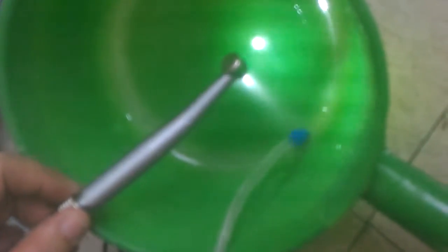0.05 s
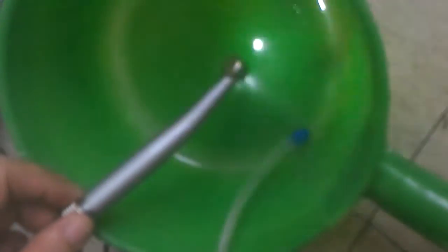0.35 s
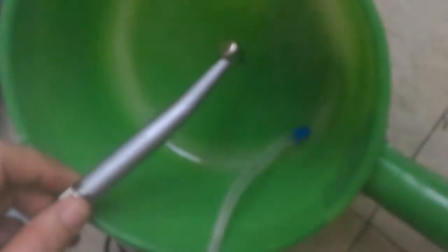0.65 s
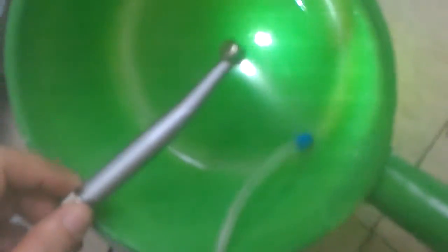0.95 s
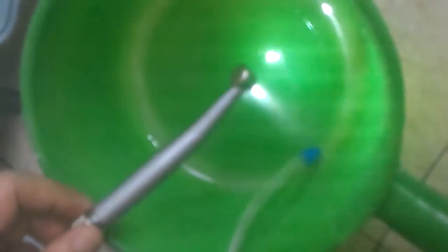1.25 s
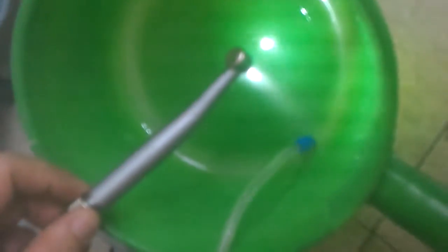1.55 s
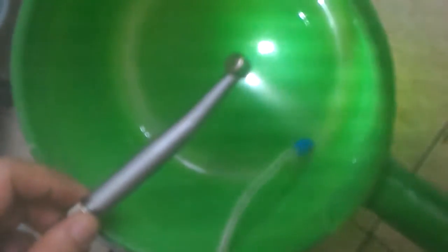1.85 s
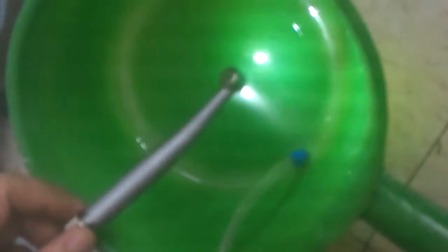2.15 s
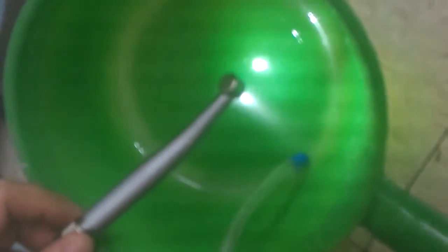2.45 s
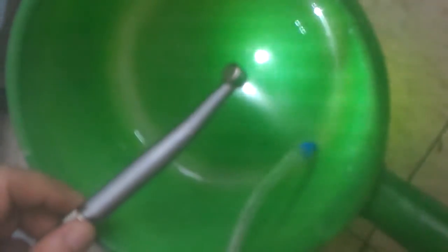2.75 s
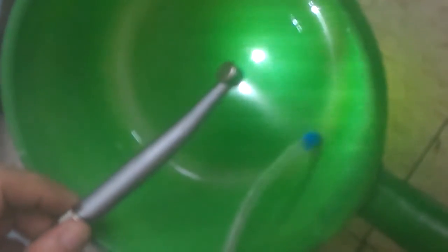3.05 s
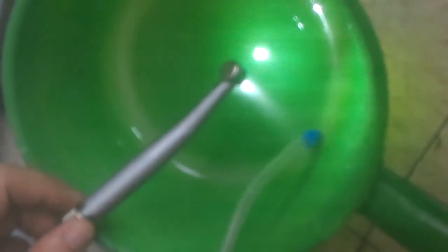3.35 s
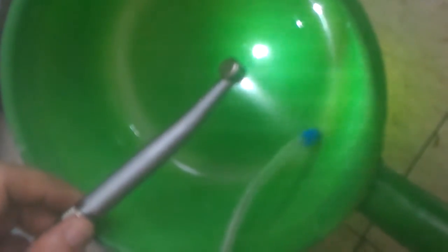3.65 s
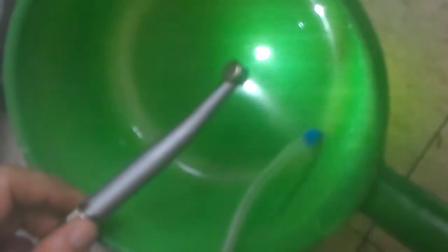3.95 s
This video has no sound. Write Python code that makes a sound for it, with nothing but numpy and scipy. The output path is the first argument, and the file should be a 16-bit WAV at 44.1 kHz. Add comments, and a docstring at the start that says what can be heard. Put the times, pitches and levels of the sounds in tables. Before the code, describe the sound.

A dental air turbine whines and hisses close up over a plastic basin. At about 0.5 seconds the hiss fades and the pitch falls. A valve spits at 0.8, and the whine climbs back by 1.5, as water joins in a hoarse, whistling spray lasting until 4 seconds, the whine now fainter. Throughout, a suction tube slurps with small droplet pops, and a pump chugs and hums behind.

```python
"""A dental surgery, one microphone close to a plastic basin.
In the background a piston pump chugs under the hum of its mains motor, and a suction tube slurps.
In front an air turbine whines and hisses. Its air is cut for a moment: the hiss dies and the rotor
coasts down. A valve spits, the rotor climbs back, and water joins the air in a hoarse, whistling spray."""
import sys
import numpy as np
from scipy import signal
from scipy.fft import rfft, irfft
from scipy.io import wavfile

SR = 44100
rng = np.random.default_rng(int(sys.argv[2]) if len(sys.argv) > 2 else 0)


def master_out(mix):
    """Clip the mix to full scale and print it as 16-bit PCM to the path in sys.argv[1]."""
    frames = np.transpose(np.atleast_2d(mix))
    ceiling = np.clip(frames, -1, 1)
    pcm = np.round(ceiling * 32767).astype(np.int16)
    wavfile.write(sys.argv[1], SR, pcm)


N = 176400
T = np.arange(N) / SR
FREQS = np.fft.rfftfreq(N, 1 / SR)


def amp(db):
    """Decibels to gain."""
    return 10 ** (np.asarray(db) / 20)


def unit(x):
    """Scales to an rms of one."""
    return x / np.sqrt(np.mean(x ** 2) + 1e-20)


def curve(table, column=1):
    """One column of a time table, joined by straight lines."""
    rows = np.array(table)
    return np.interp(T, rows[:, 0], rows[:, column])


def colour(x, spectrum):
    """Minimum-phase filter: it rings after a hit, never before."""
    hz, db = np.transpose(spectrum)
    gain_db = np.interp(np.log(FREQS + 1), np.log(hz + 1), np.maximum(db, -100))
    cepstrum = irfft(np.log(amp(gain_db)), N)
    cepstrum[1:N // 2] *= 2
    cepstrum[N // 2 + 1:] = 0
    return irfft(rfft(x) * np.exp(rfft(cepstrum)), N)


def noise(spectrum):
    """Coloured noise of rms one."""
    return unit(colour(rng.standard_normal(N), spectrum))


def drift(rate_hz):
    """Random wavering of rms one, up to about the given rate."""
    return unit(irfft(rfft(rng.standard_normal(N)) * np.exp(-(FREQS / rate_hz) ** 2), N))


def tone(turns, db):
    """A sine at an rms level."""
    return np.sqrt(2) * amp(db) * np.sin(2 * np.pi * turns)


def decay(start_s, db, decay_s):
    """Envelope that jumps up and dies away."""
    return amp(db) * (T > start_s) * np.exp(-abs(T - start_s) / decay_s)


def bursts(envelope, spectrum):
    """Short gusts of noise that ring a resonant body."""
    ring = colour(signal.unit_impulse(N), spectrum)
    return colour(envelope * rng.standard_normal(N), spectrum) / np.linalg.norm(ring)


def basin(x, t60_s=0.14, tail_db=-8.5):
    """The direct sound reaches the microphone with short, dense reflections off the plastic bowl."""
    t = T[:SR // 4]
    tail = rng.standard_normal(len(t)) * np.exp(-np.log(1000) * t / t60_s)
    return x + amp(tail_db) * signal.fftconvolve(x, tail / np.linalg.norm(tail))[:N]


# Piston pump tones: multiple of the shaft rate, level/dB
SHAFT_TONES = [(2, -32.5), (3, -48), (4, -28.5), (5, -41.5), (6, -43.5), (7, -50.5), (8, -34), (9, -40),
               (10, -47.5), (11, -44.5), (12, -38.5), (13, -44), (14, -59.5), (16, -45), (17, -48.5),
               (19, -52), (22, -51.5), (24, -46.5)]
# Motor casing tones: f/Hz, level/dB
CASING_TONES = [(175, -38), (213.3, -43.5), (239.8, -41), (450.8, -61)]
# Pump exhaust: f/Hz, relative level/dB
EXHAUST_SPECTRUM = [(15, -22), (45, -2), (80, -18), (130, -2), (230, 2), (320, -9.5), (400, -2),
                    (480, -2.5), (570, -8.5), (660, -6), (800, -8.5), (1150, -7), (1600, -3.5), (4000, -38)]


def pump(shaft_hz=27.578, mains_hz=119.93, stroke_s=.016, puff_s=.0092):
    """In the background: shaft tones bunched round each stroke, motor hum and puffs of exhaust."""
    turns = shaft_hz * (T - stroke_s)
    chug = np.zeros(N)
    for order, db in SHAFT_TONES:
        scatter = 1.33 * np.log(order / 2) * rng.standard_normal() / (4 * np.pi)  # blurs the stroke
        chug += tone(round(order) * turns + scatter, db)
    hum = tone(mains_hz * (T - .00033), db=-35)
    casing = sum(tone(hz * T + rng.random(), db) for hz, db in CASING_TONES)
    puffs = unit(1 + 0.2 * np.cos(2 * np.pi * 2 * shaft_hz * (T - puff_s)))  # two a turn
    return chug + hum + casing + amp(-31) * puffs * noise(EXHAUST_SPECTRUM)


# Air drawn into the suction tube: f/Hz, relative level/dB
DRAUGHT_SPECTRUM = [(500, -25), (1150, -12), (1330, 3), (1560, -10), (1770, 4), (1970, -4.5), (2110, 0),
                    (2310, -7), (2480, 1), (2620, -6), (2770, 1.5), (2880, -1), (3060, 0), (3230, 0.5),
                    (3480, 3), (3750, -8.5), (4400, -14), (5700, -26.5), (7300, -14), (9000, -18.5),
                    (11000, -19.5), (13000, -30), (15700, -40)]
# Ring of a drop pulled into the tube: f/Hz, relative level/dB
DROP_SPECTRUM = [(400, -34.5), (1130, -17), (1330, 4.5), (1550, -5.5), (1780, -0.5), (1960, -4),
                 (2120, 1.5), (2320, -2), (2470, -4), (2750, -12.5), (3450, -8), (4200, -19), (6000, -32.5),
                 (12000, -32)]
# Large drops: t/s, level/dB
LARGE_DROPS = [(0.099, -15), (.283, -16), (0.504, -23), (0.65, -19), (0.848, -16), (.919, -16.5),
               (1.017, -17.5), (1.124, -20), (1.65, -17), (1.682, -16.5), (1.856, -23), (1.875, -21),
               (1.963, -16.5), (2.0427, -10), (2.287, -14.5), (2.981, -17), (3.055, -15.5), (3.093, -16),
               (3.187, -17.5), (3.422, -16.5), (3.697, -22), (3.793, -22), (3.862, -15.5), (3.89, -15)]


def suction(drops_per_s=300, spread_db=5, clump_db=1.0, flicker_db=1.22):
    """Beside the turbine: a steady draught, with clumps of small drops and some large ones bursting."""
    surge = drift(rate_hz=71)  # sways both drop size and draught
    size_db = spread_db * np.minimum(rng.exponential(1, N), 2) + clump_db * np.minimum(surge, 2)
    drops = amp(size_db) * rng.choice([-1, 1], N) * (rng.random(N) < drops_per_s / SR)
    slurp = amp(-32.5) * unit(colour(drops, DROP_SPECTRUM))
    gulps = bursts(sum(decay(s, db, decay_s=.0035) for s, db in LARGE_DROPS), DROP_SPECTRUM)
    draught = amp(-28.5 + flicker_db * surge) * unit(basin(noise(DRAUGHT_SPECTRUM)))
    return slurp + gulps + draught


def bubble(at_s=.376, hz=1120, width_s=.012):
    """One larger, lower gurgle in the tube."""
    ring = noise([(hz / 2, -40), (hz * 0.84, -9), (hz, 0), (hz * 1.26, -8), (hz * 2, -35)])
    return ring * amp(-27) * np.exp(-((T - at_s) / width_s) ** 2)


# Spit of the air valve: f/Hz, relative level/dB
SPIT_SPECTRUM = [(200, -2), (1000, -9), (1600, 0), (2500, -4), (3500, 8), (4400, -8), (6000, -24),
                 (6900, -13), (7500, -3), (9500, -4), (10400, -17), (12000, -26), (15000, -38)]


def valve():
    """One spit of air as the supply reopens."""
    return bursts(decay(start_s=.8115, db=-15, decay_s=.0042), SPIT_SPECTRUM)


# Hoarse whistle of the spray nozzle: t/s, level/dB, f/Hz
NOZZLE_WHISTLE = [(0, -61, 3450), (1.42, -73, 3700), (1.52, -34, 3600), (1.8, -33, 3536),
                  (1.95, -37.5, 3473), (4, -40.5, 3446)]


def whistle(width_hz=170):
    """Once the spray is at full flow, noise rings a resonance of the nozzle."""
    turns = np.cumsum(curve(NOZZLE_WHISTLE, column=2)) / SR
    fuzz = drift(width_hz) + 1j * drift(width_hz)
    return amp(curve(NOZZLE_WHISTLE)) * (fuzz * np.exp(2j * np.pi * turns)).real


def wetness(start_s=0.95, rise_s=0.49):
    """Water joins the jet: 0 is air alone, 1 is full spray."""
    return np.clip((T - start_s) / rise_s, 0, 1)


# Hiss of air through the handpiece, at the microphone: t/s, level/dB
HISS_LEVEL = [(0, -27), (.42, -28.5), (.56, -34), (.64, -38), (.81, -53), (.84, -36), (.89, -27.5),
              (.935, -28), (.96, -29), (1.16, -27), (1.6, -26.5), (4, -27.5)]
# Nozzle blowing air alone: f/Hz, relative level/dB
AIR_SPECTRUM = [(2900, -28), (3700, -14), (4050, -3.5), (4600, -17), (5150, -11), (5600, -19),
                (6100, -19.5), (6650, -5.5), (7000, -13.5), (7400, 1.5), (7650, 2.5), (8250, -10),
                (8650, 1.5), (9150, -2.5), (9500, -8), (10100, -5.5), (10330, -8), (10620, 0.5),
                (11100, -9.5), (11500, -6.5), (12250, -19), (12800, -11), (13700, -20), (14900, -21),
                (15700, -28)]
# Nozzle blowing air and water: f/Hz, relative level/dB
SPRAY_SPECTRUM = [(2900, -38), (3250, -9), (3440, -20), (3700, -9), (4300, -15), (4850, -24), (5120, -6.5),
                  (5350, -14.5), (5800, -17.5), (6250, -16), (6640, -6), (7000, -10.5), (7270, 0),
                  (7550, 2), (7900, -8), (8160, -10), (8500, -2.5), (8750, -5), (9100, -3), (9490, -0.5),
                  (9640, -14), (9880, -4), (10080, -3), (10550, 0), (10780, -8), (11100, -14.5),
                  (11350, -5), (11850, -15.5), (12400, -16), (12800, -18), (13020, -14), (13400, -19),
                  (15000, -20.5), (15700, -43)]


def jet(flicker_db=0.56):
    """Close up, the nozzle hisses into the basin; its resonances shift once water joins in."""
    wet = wetness()
    hiss = np.sqrt(1 - wet) * noise(AIR_SPECTRUM) + np.sqrt(wet) * noise(SPRAY_SPECTRUM)
    return unit(basin(hiss)) * amp(curve(HISS_LEVEL) + flicker_db * drift(rate_hz=99))


# Rotor speed and whine: t/s, f/Hz, level/dB
ROTOR_RUN = [(0, 4725, -43), (.25, 4718, -39.5), (.41, 4700, -44), (.48, 4525, -39), (.545, 4240, -32),
             (.62, 3806, -29), (.695, 3390, -24), (.713, 3290, -16.5), (.745, 3120, -28), (.79, 2870, -36),
             (.87, 2800, -44), (.92, 3090, -29), (.958, 3350, -21.5), (1.0, 3610, -33), (1.06, 3917, -30),
             (1.16, 4248, -33), (1.32, 4550, -43), (1.5, 4675, -44), (1.78, 4738, -43), (2.0, 4745, -50),
             (2.6, 4738, -45), (3.12, 4665, -54), (3.55, 4738, -46), (4, 4690, -51)]
# Overtones and bearing tones: multiple of the speed, level/dB at top speed before roll-off, wander share
ROTOR_TONES = [(2, -49, .004), (2.1, -47, .005), (3, -47, .004), (3.2, -43.5, .004)]


def turbine(rotor_wander=.0016, rolloff_hz=11600):
    """Close up, over the basin: the rotor whines, wavering more in the spray; overtones grow with speed."""
    speed_hz = curve(ROTOR_RUN)
    flutter_db = 1.1 + 2.0 * wetness()
    speed_db = 20 * 2.6 * np.log10(speed_hz / speed_hz.max())  # amplitude goes as speed ** 2.6
    partials = [(1, curve(ROTOR_RUN, column=2), rotor_wander)]
    partials += [(multiple, db + speed_db, wander) for multiple, db, wander in ROTOR_TONES]
    whine = np.zeros(N)
    for multiple, db, wander in partials:
        hz = multiple * speed_hz * (1 + wander * drift(rate_hz=70.6))
        waver_db = flutter_db * drift(rate_hz=14)
        whine += tone(np.cumsum(hz) / SR, db + waver_db) / (1 + (hz / rolloff_hz) ** 12)
    return whine


def scene():
    """All sources at one close microphone."""
    return (pump() + turbine() + jet() + valve() + suction() + bubble() + whistle())[None]


def record(dry, edge_hz=15750):
    """The recorder's band limit."""
    lowpass = signal.firwin(511, edge_hz, window=("kaiser", 9), fs=SR)
    return signal.oaconvolve(dry, lowpass[None], "same")


dry = scene()
out = record(dry)
master_out(out)
```